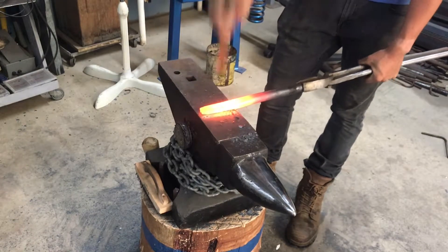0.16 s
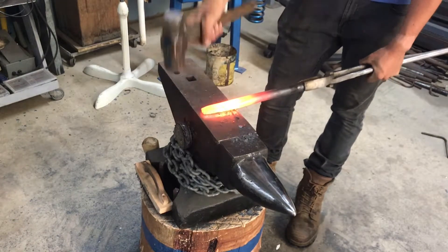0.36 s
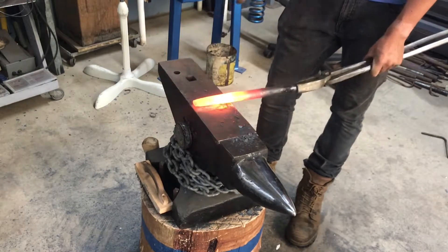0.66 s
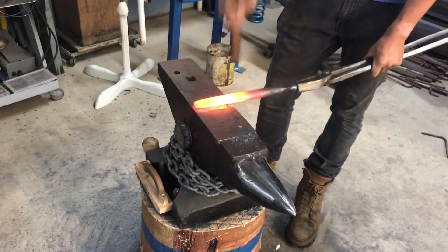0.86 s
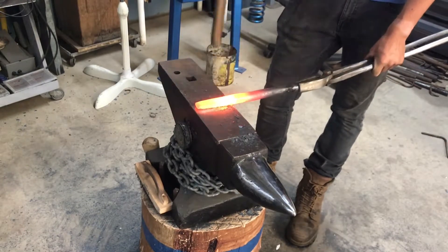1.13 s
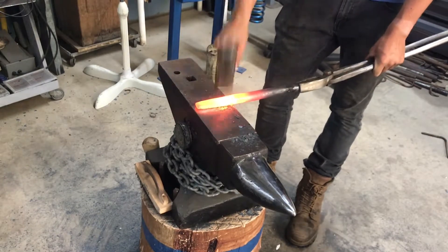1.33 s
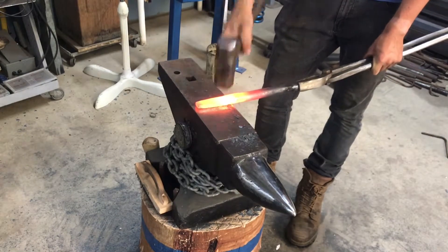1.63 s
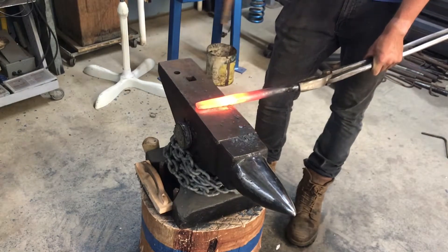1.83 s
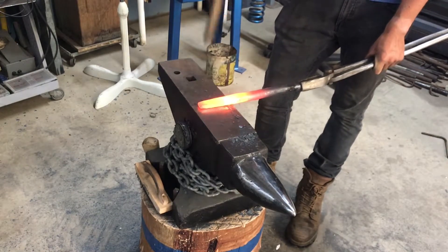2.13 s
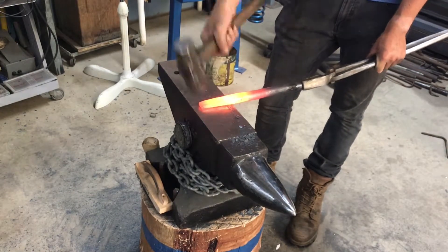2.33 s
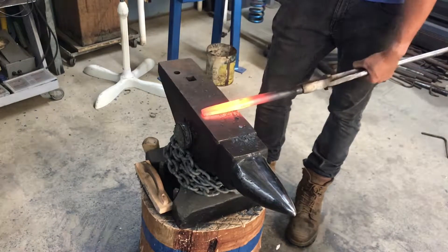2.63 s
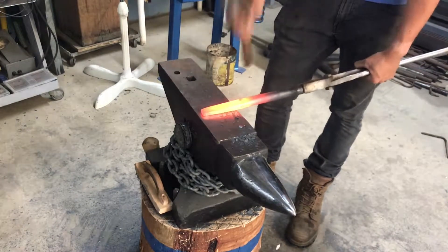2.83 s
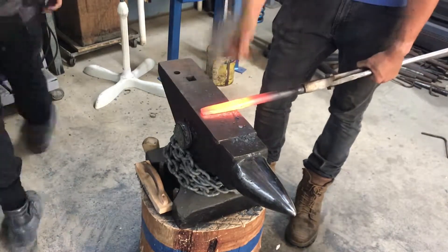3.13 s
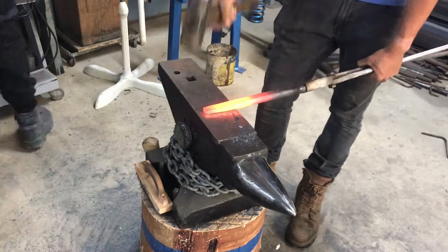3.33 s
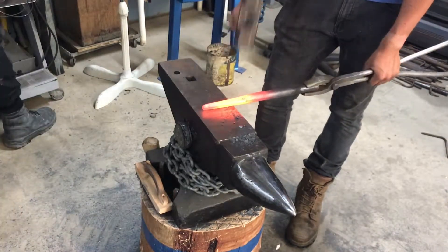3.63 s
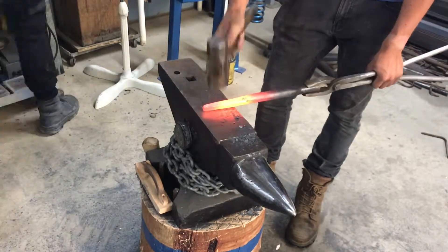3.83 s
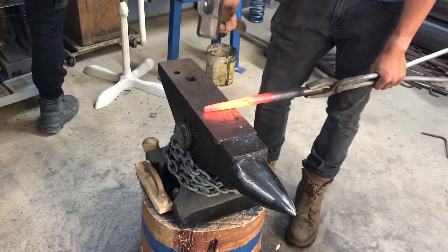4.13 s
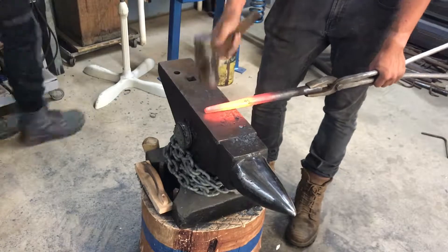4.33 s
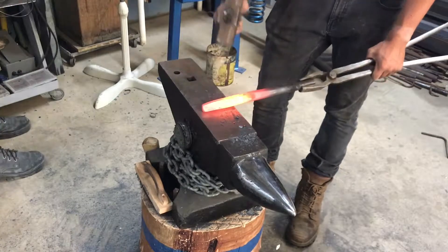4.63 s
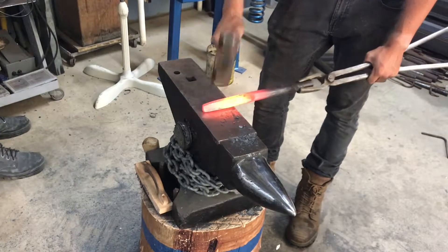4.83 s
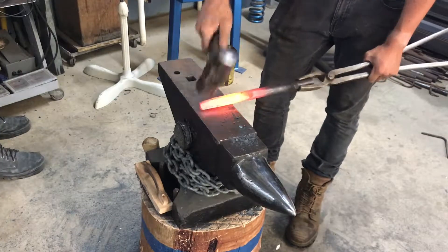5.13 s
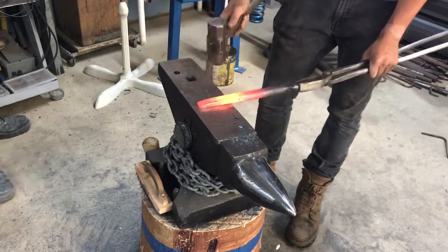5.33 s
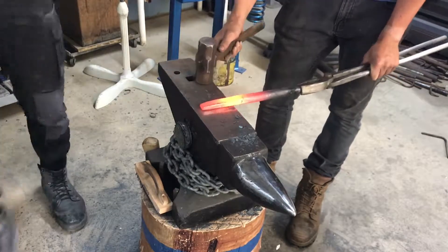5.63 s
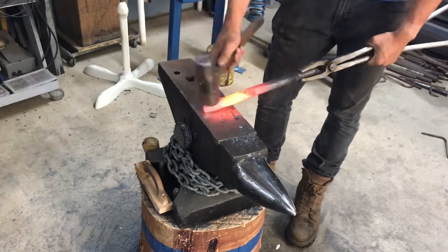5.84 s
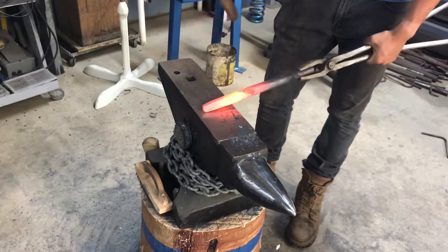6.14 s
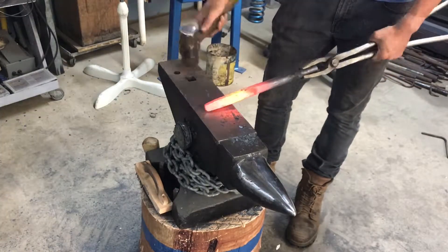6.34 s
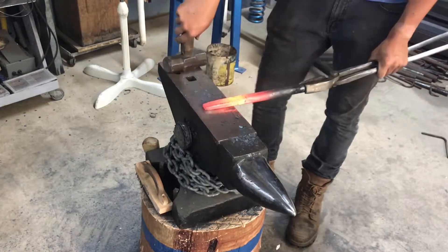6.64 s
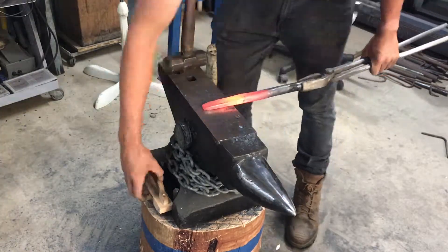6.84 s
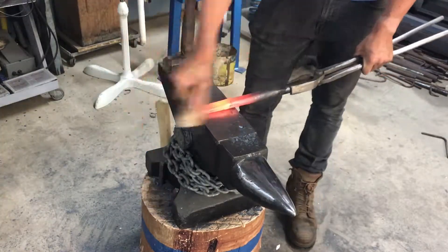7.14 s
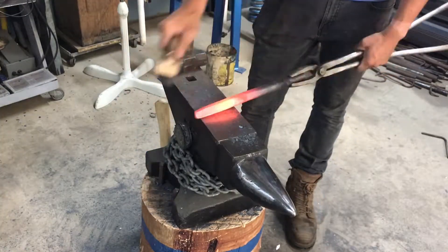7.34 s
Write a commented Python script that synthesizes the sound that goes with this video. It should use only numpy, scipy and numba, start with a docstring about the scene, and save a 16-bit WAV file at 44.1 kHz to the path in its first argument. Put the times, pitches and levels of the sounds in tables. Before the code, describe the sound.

Quick runs of heavy hammer blows crunch and clank on hot steel over an anvil, then lighter taps and bounces, above a steady gas forge roar.

```python
"""Forging at the anvil

A smith draws out a hot steel bar on an anvil and stump: three runs of heavy blows, then quick light ones.
Enveloped noise makes snapping and crushed scale; decaying modes make thud, clank and metallic ring.
Towards the end the hammer bounces on the bare anvil face, and a wire brush scrapes as it is lifted.
Filtered, fluttering noise makes the gas forge's steady roar, which a limiter ducks at each loud blow.
"""
import sys
import numpy as np
from scipy import signal
from scipy.fft import rfft, irfft
from scipy.io import wavfile
from scipy.ndimage import uniform_filter1d, minimum_filter1d
from numba import njit

SR = 44100
rng = np.random.default_rng(int(sys.argv[2]) if len(sys.argv) > 2 else 0)


def output_pcm(signal):
    """Save a mono or channel-first signal as 16-bit PCM at the path in sys.argv[1].

    Samples are clipped to [-1, 1] before scaling.
    """
    pcm = np.clip(np.atleast_2d(signal).T, -1, 1) * 32767
    wavfile.write(sys.argv[1], SR, np.round(pcm).astype(np.int16))


N = 329868
T = np.arange(int(.3 * SR)) / SR  # time within one hit, s

# broad spectrum of the forge, before overall scaling: frequency_hz, level_db
FORGE_SPECTRUM = [(30, -86), (100, -54), (170, -32.5), (250, -22.5), (480, -17.5), (850, -12.5), (1220, -7),
                  (1480, -24), (2450, -38), (3700, -23), (5000, -34), (9000, -34), (11200, -48),
                  (15700, -46.5)]
# resonances of forge chamber and burner jets: centre_hz, full_width_at_half_lift_hz, lift_db
FORGE_RESONANCES = [(302, 61, 3.5), (571, 217, 7.5), (667, 35, -7.5), (781, 22, 7.5), (930, 69, 5.5),
                    (1067.3, 81.4, 10), (1183, 77, 4.5), (1410, 11.5, 7.5), (2046, 67, 6), (2275, 65, 9.5),
                    (2740, 68, 5.5), (3120, 62, 8), (3487, 58, 9.5), (7450, 97, 8.5), (7676, 204, 13.5),
                    (8476, 105, 14.5), (8730, 190, 9), (10160, 170, 12.5), (10500, 180, 6),
                    (12080, 260, 13.5)]
# blows on the hot bar: start_s, force_db, depth (0-1, how far the hammer sinks in)
BLOWS_ON_BAR = [(.104, 1.5, 0.75), (0.2474, 0, 0.85), (.394, 2, 0.7), (0.8141, 0, 0.6), (.950, 2.5, 0.8),
                (1.091, 1, 0.71), (1.232, 0, 0.88), (1.404, -6, .75), (1.546, 1.5, 0.97),
                (1.682, -0.5, 0.97), (1.8199, -0.5, 0.9), (1.957, -1.5, 0.97), (2.092, -0.5, 0.9),
                (2.232, 1, 0.97), (2.377, 3.5, 0.37), (2.769, 0, 0.92), (2.9172, 1, 0.9),
                (3.0631, -0.5, 0.98), (3.210, 2, 1), (3.356, -1, 0.95), (3.656, -8.5, 0.16),
                (3.7832, -7.5, 0.07), (3.8846, -4.5, 0.16), (3.9925, -4, .25), (4.124, -3.5, .2),
                (4.255, -5, .3), (4.3824, -2.5, 0), (4.6329, -10, 0), (4.738, -7, 0.14), (4.83, -6, 0),
                (4.9135, -6, 0.04), (4.997, -9.5, 0.03), (5.084, -3, 0), (5.1704, -5.5, 0.05),
                (5.2664, -14, 0), (5.507, -17, 0.6), (5.902, -5, 0.22), (6.2873, 1, 0.3)]
# ring of the chain-damped anvil: frequency_hz, relative_level_db, t60_s
ANVIL_MODES = [(7140, -5, .07), (7200, 0, .12), (7982, -4, .09), (8650, -10, .05), (8950, -10, .05),
               (11880, -7, .09)]
# ring of the hammer head before the grip damps it: frequency_hz, relative_level_db, t60_s
HAMMER_MODES = [(9330, -9, .06), (9415, -4, .09), (9470, -4, .09), (9515, 0, .1), (15275, -8, .09)]
# anvil and stump, struck through the soft bar: frequency_hz, relative_level_db, t60_s
THUD_MODES = [(250, -6, 0.087), (286, 3.5, 0.021), (365, 6.5, 0.044), (404, 2, 0.053), (484, 0.5, 0.098),
              (670.4, -8, 0.15), (822.5, 1.5, 0.087), (885, 2, 0.063), (938, -7, 0.093), (950, -11, 0.069),
              (1200, -30, 0.087)]
# bar, tongs and hammer handle: frequency_hz, relative_level_db, t60_s
CLANK_MODES = [(1450, -4, .05), (1530, -6, .05), (1635, 2, .06), (1730, -4, .05), (1830, -7, .05),
               (2055, -3, .06), (2140, -7, .05), (2250, 2, .08), (2412, -2, .08), (2580, -6, .05),
               (2830, -11, .05)]
# hammer drops on the bare face: start_s, force_db, first_hop_s, first_hop_loss_db,
# hammer_ring_db (at 0 dB force)
HAMMER_DROPS = [(5.574, 3, .031, 2, -41), (6.002, 0.5, 0.035, 0.5, -28), (6.421, -3.5, .028, 0.3, -22),
                (6.633, -2.5, 0.017, 14, -23)]

# source levels at 0 dB force, dB: (shallow blow, deep blow)
SNAP_DB, CRUSH_DB, HAMMER_DB = (-27, -35), (-27.5, -20.5), (-42, -20)
THUD_DB, CLANK_DB = (-18.5, -14), (-23.5, -19.5)
STUMP_DB, SLAB_DB = (-34, -24), (-56, -42)
# relative levels, dB: (shallow blow, deep blow)
KNOCK_DB = (7, -4)  # dry knock against the ring within the clank
ANVIL_DB = (-4.5, 0.5)  # anvil ring against the crushed scale
CRUSH_T60_S = (0.056, .085)  # grinding lasts longer in a deep blow (shallow, deep)
SNAP_GROWTH = 0.11  # dB of snap per dB of force: loose scale breaks at almost any touch
SQUASH_S = 0.000978  # from first contact until the load reaches the anvil
GRIP_T60_S = 0.32  # extra damping of the hammer head by hand and handle
HOP_RATIO = .4  # length of each hop against the one before
DROP_TICK_DB, DROP_CLANK_DB = -30, -32  # at 0 dB force
FORGE_DB = -27  # RMS level of the whole roar, ahead of the limiter
TOP_HZ = 15900  # upper edge of the final pass band


def undb(db):
    """Decibel law: 20 dB is a factor of ten in amplitude."""
    return 10 ** (np.asarray(db) / 20)


def rms(x):
    """Root mean square: the amplitude of equal mean power."""
    return np.sqrt(np.mean(x ** 2))


def fade(t60):
    """Exponential damping: the amplitude falls by 60 dB in t60 seconds."""
    return np.exp(-np.log(1000) * T / t60)


def attack_level(x, db):
    """Onset normalisation: the RMS of the first 256 samples (about 6 ms) is set to db."""
    return x * undb(db) / rms(x[:256])


def band(x, low_hz, high_hz, order=2):
    """Band limitation by a causal Butterworth filter."""
    sos = signal.butter(order, [low_hz, high_hz], "band", fs=SR, output="sos")
    return signal.sosfilt(sos, x)


def add(out, start_s, x):
    """Superposition: a sound is summed into the mix from its start time."""
    i = int(start_s * SR)
    out[i:i + len(x)] += x[:N - i]


def walk(rate_hz):
    """Slow random fluctuation: smoothed random steps, scaled to unit RMS."""
    k = int(SR / rate_hz)
    steps = np.repeat(rng.standard_normal(N // k + 1), k)
    drift = uniform_filter1d(uniform_filter1d(steps, k), k)[:N]
    return drift / rms(drift)


def burst(low_hz, high_hz, t60, db, order=2):
    """Noise excitation: a dense cloud of grains that decays exponentially within one band."""
    grains = rng.standard_normal(len(T)) * fade(t60)
    return attack_level(band(grains, low_hz, high_hz, order), db)


def ring(modes, scatter_db, detune):
    """Modal vibration: balance varies with the spot struck, and crossing reflections make modes waver."""
    hz, db, t60 = np.transpose(modes)[:, :, None]
    size, shift, phase = rng.standard_normal((3, len(hz), 1))
    noise = rng.standard_normal((2, len(hz), len(T)))
    paths = uniform_filter1d(uniform_filter1d(noise, 220), 220)
    paths *= .55 / rms(paths)
    waver = 1 + paths[0] + 1j * paths[1]  # complex, so amplitude and phase both vary
    waves = np.imag(waver * np.exp(2j * np.pi * (hz * (1 + detune * shift) * T + phase)))
    return np.sum(undb(db + scatter_db * size) * np.exp(-np.log(1000) * T / t60) * waves, axis=0)


def forge(flutter_db=0.15, swell_db=0.74, hiss_flutter_db=0.2):
    """Turbulent combustion: flame rings the chamber and flutters; gas jets hiss more evenly above it."""
    hz = np.fft.rfftfreq(N, 1 / SR) + 1  # 1 Hz offset keeps the logarithm finite
    points, levels = np.transpose(FORGE_SPECTRUM)
    db = np.interp(np.log(hz), np.log(points), levels)
    for centre, width, lift in FORGE_RESONANCES:
        db = db + lift * 2 ** -((2 * (hz - centre) / width) ** 2)
    gas = rfft(rng.standard_normal(N)) * undb(db)
    low = 1 / (1 + (hz / 2000) ** 4)  # flame below about 2 kHz, jets above
    flame = irfft(gas * low, N) * undb(flutter_db * walk(35) + swell_db * walk(3.35))
    jets = irfft(gas * (1 - low), N) * undb(hiss_flutter_db * walk(13))
    roar = flame + jets
    return roar * undb(FORGE_DB) / rms(roar)


def snap(db):
    """Brittle fracture: scale cracks at first contact, with a bright edge of splintering."""
    t60 = .014
    middle = burst(2400, 7000, t60, db - 6)
    edge = burst(12300, 15000, t60, db)
    return middle + edge + burst(2400, 16000, t60, db - 7)


def crush(db, ring_db, t60, rise_s=0.00061):
    """Comminution: scale grinds to grit as the hammer sinks in, while the anvil rings."""
    grit = burst(2900, 12600, t60, db) + burst(5440, 8600, t60, db - 4)
    anvil = attack_level(ring(ANVIL_MODES, 3.1, 0.00087), db + ring_db)
    return (grit + anvil) * (1 - np.exp(-T / rise_s))  # exponential onset


def thud(db, push_hz=900, push_width_hz=700, spread=0.0045, shudder_db=-10):
    """Impulsive modal excitation: the blow shoves anvil and stump; phase dispersion spreads the push."""
    body = np.zeros(len(T))
    for hz, mode_db, t60 in THUD_MODES:
        size, shift = rng.standard_normal(2)
        wave = np.cos(2 * np.pi * hz * (1 + spread * shift) * T)
        body += undb(mode_db + size) * fade(t60) * wave
    body = band(body, 282, 1530, order=4)
    # reversed poles form an all-pass filter; delay is greatest around push_hz
    _, poles = signal.iirpeak(push_hz, push_hz / push_width_hz, fs=SR)
    body = signal.lfilter(poles[::-1], poles, body)
    return attack_level(body, db) + burst(276, 1155, 0.11, db + shudder_db, order=4)


def clank(db, knock_db):
    """Elastic impact: a hard steel knock and the short modal ring of bar and tools."""
    tones = attack_level(ring(CLANK_MODES, 1, .002), 0)
    knock = burst(1440, 2506, 0.0089, knock_db, order=3)
    return attack_level(tones + knock, db)


def blows():
    """Plastic impact: scale snaps, the bar squashes, then the load reaches anvil, stump and floor."""
    out = np.zeros(N)
    for start_s, force_db, depth in BLOWS_ON_BAR:
        def at_depth(ends):
            """Linear interpolation between a shallow and a deep blow."""
            return np.interp(depth, (0, 1), ends)

        grinding = crush(at_depth(CRUSH_DB), at_depth(ANVIL_DB), at_depth(CRUSH_T60_S))
        hammer = ring(HAMMER_MODES, 1.9, 0.00016) * fade(GRIP_T60_S)
        hammer = attack_level(hammer, at_depth(HAMMER_DB))
        stump = attack_level(band(fade(0.0059), 208, 326, order=3), at_depth(STUMP_DB))
        slab = attack_level(band(fade(0.0036), 17, 220, order=1), at_depth(SLAB_DB))
        contact = snap(at_depth(SNAP_DB) + SNAP_GROWTH * force_db)
        load = thud(at_depth(THUD_DB)) + clank(at_depth(CLANK_DB), at_depth(KNOCK_DB)) + stump + slab
        add(out, start_s, contact + undb(force_db) * (grinding + hammer))
        add(out, start_s + SQUASH_S, undb(force_db) * load)
    return out


def drops(count=3):
    """Restitution: ever shorter, weaker hops on the bare face; each hard contact rings the hammer head."""
    out = np.zeros(N)
    for start_s, force_db, hop_s, loss_db, hammer_db in HAMMER_DROPS:
        for k in range(count):
            knock = attack_level(band(clank(0, 4.3), 1840, 2800), DROP_CLANK_DB)
            tick = burst(4000, 12500, 0.015, DROP_TICK_DB)
            head = ring(HAMMER_MODES, 1.5, 0.00096) * fade(GRIP_T60_S)
            head = attack_level(band(head, 6000, 12300), hammer_db)
            add(out, start_s, undb(force_db - loss_db * k ** 2) * (tick + knock + head))
            start_s += hop_s * HOP_RATIO ** k
    return out


def brush(start_s=7.088, db=-35, rise_s=0.0045):
    """Friction noise: wire bristles scrape briefly as the brush is lifted."""
    out = np.zeros(N)
    scrape = burst(4000, 14000, 0.088, db) + burst(2600, 14000, 0.25, db + 2.5)
    add(out, start_s, scrape * (1 - np.exp(-T / rise_s)))
    return out


def workshop(x, gap_s=0.0044):
    """Diffuse reflection: floor and nearby clutter scatter the hits, and a short, weak tail follows."""
    echo = np.zeros(len(T))
    for db, t60 in ((-9, 0.05), (-16, 0.32)):  # early scatter, late tail
        tail = rng.standard_normal(len(T)) * fade(t60) * (T > gap_s)
        echo += undb(db) * tail / np.linalg.norm(tail)
    return x + signal.fftconvolve(x, band(echo, 430, 14400, order=1))[:N]


def scene():
    """Superposition: the reflected hits and scrape are added to the direct roar of the forge."""
    return (workshop(blows() + drops() + brush()) + forge())[None]


@njit
def follow(x, rise, fall):
    """Envelope detection: one-pole smoothing with separate attack and release."""
    env, e = np.empty(len(x)), 0.
    for i in range(len(x)):
        e += (abs(x[i]) - e) * (rise if abs(x[i]) > e else fall)
        env[i] = e
    return env


def record(dry, limit_db=-8, release_s=0.093):
    """Dynamic limiting: look-ahead gain catches loud blows and recovers gradually; the top is cut."""
    env = follow(dry[0], 0.73, 1 / (release_s * SR))
    gain = np.minimum(1, undb(limit_db) / (env + 1e-9))
    # centred windows lower the gain just before each peak
    gain = uniform_filter1d(minimum_filter1d(gain, size=33), size=33)
    limited = .7 * np.tanh(dry * gain / .7)  # soft saturation
    return signal.sosfilt(signal.ellip(8, .2, 70, TOP_HZ, fs=SR, output="sos"), limited)


dry = scene()
out = record(dry)
output_pcm(out)
```